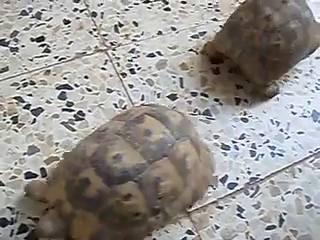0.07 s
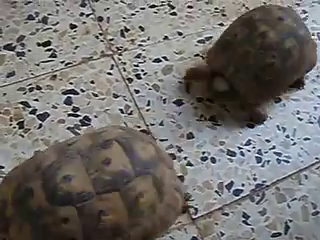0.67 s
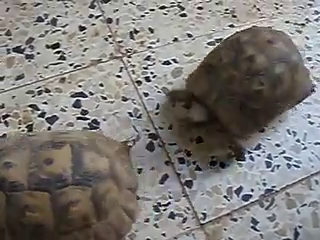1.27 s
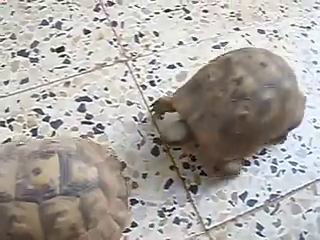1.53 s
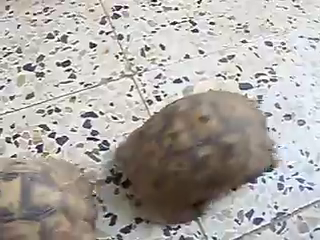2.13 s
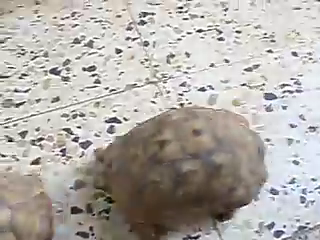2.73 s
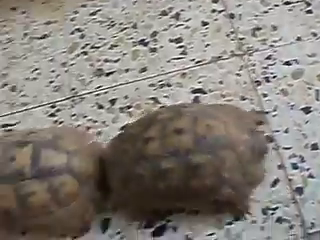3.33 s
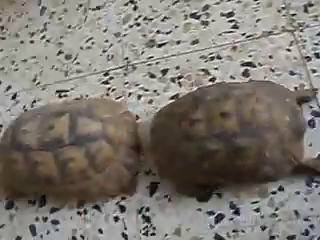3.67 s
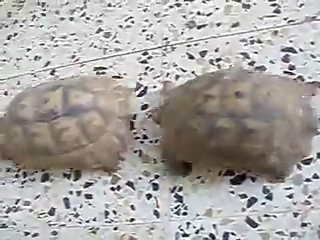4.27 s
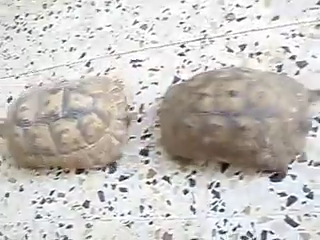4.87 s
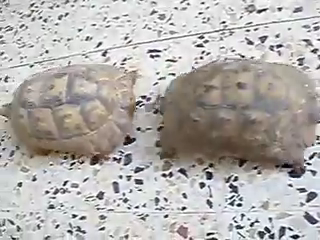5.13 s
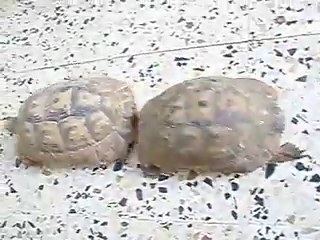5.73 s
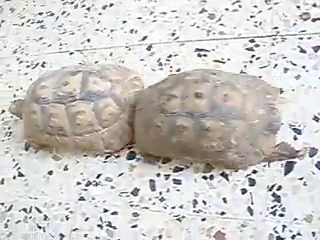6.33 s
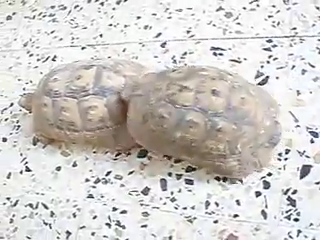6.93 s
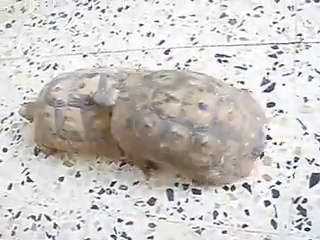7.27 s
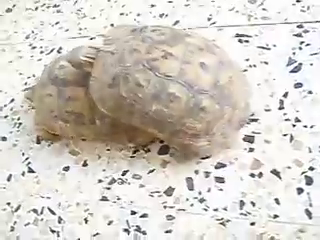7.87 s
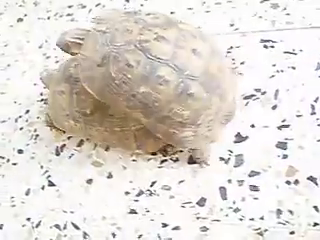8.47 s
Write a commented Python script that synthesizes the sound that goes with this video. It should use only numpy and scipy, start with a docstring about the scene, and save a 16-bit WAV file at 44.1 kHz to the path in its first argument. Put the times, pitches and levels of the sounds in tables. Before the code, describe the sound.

Over room hiss, a tortoise scuffs across tile and repeatedly butts another's shell, mostly dropping back with a sharp click.

```python
"""Two tortoises on a tiled floor indoors, close to a narrow-band phone microphone that peaks near 3.5 kHz.
Hiss and a low room rumble come first, then claws and shell rims scuff and tap on the tile.
From 3.2 s one rams the other: shell butts shell with a hollow knock, and the rammer mostly drops back
with a sharp tick. The second butt sets the rammed shell rocking; the loudest knocks overload the phone.
After more scuffs, a double butt at 7.8 s ends the bout."""
import sys
import numpy as np
from scipy import signal
from scipy.fft import rfft, irfft, next_fast_len
from scipy.io import wavfile

SR = 44100
rng = np.random.default_rng(int(sys.argv[2]) if len(sys.argv) > 2 else 0)


def to_wav(sig):
    """Store sig (one row per channel, or 1-D mono) as 16-bit WAV at the path in sys.argv[1].

    Samples outside -1..1 are clipped; the rate is SR.
    """
    pcm = np.clip(np.atleast_2d(sig), -1, 1) * 32767
    pcm = np.round(pcm).astype(np.int16)
    wavfile.write(sys.argv[1], SR, pcm.T)  # frames by channels


N = 379260
T = np.arange(N) / SR
RING_T = T[:SR // 4]

# spectrum of the hiss in the room: (frequency [Hz], level [dB])
HISS_SPECTRUM = [(200, -22.5), (500, -16), (850, -6), (1150, 0), (1600, -2.5), (2500, -4.5), (3500, -3.5),
                 (3900, -15.5)]
# spectrum of the room's rumble: (frequency [Hz], level [dB])
RUMBLE_SPECTRUM = [(12, -37), (20, -33.5), (50, -13.5), (95, -1), (125, -3.5), (172, -0.5), (215, -4),
                   (340, -7), (450, -13), (800, -16.5), (2000, -32)]
# the microphone's self-noise: (frequency [Hz], level [dB])
MIC_SPECTRUM = [(100, -18), (600, -8), (1500, -6), (2900, -7.5), (3200, -4.5), (3550, 1.5), (3750, -2),
                (4000, -17.5), (4400, -6.5), (4800, -20)]
# colour of the tiled room's echo: (frequency [Hz], level [dB])
ECHO_SPECTRUM = [(100, -1), (210, 0), (600, -4), (1100, -6.5), (1800, -5.5), (2700, -4.5), (3500, -0.5),
                 (5000, -7.5)]
# the phone's treble cut-off: (frequency [Hz], gain [dB])
PHONE_RESPONSE = [(3650, -1), (3800, -2.5), (3980, -3), (4300, -11.5), (4500, -27.5), (4700, -48),
                  (4900, -83.5)]
# modes of the domed shell: (frequency [Hz], level [dB], 60 dB decay time [s])
DOME_MODES = [(156, -15, 0.055), (210.6, -7, 0.079), (264, -12.5, .07), (334, -4.5, 0.055),
              (470, -8, 0.051), (497, -6.5, 0.041), (607, -2.5, 0.031), (680, -7, 0.042), (853, -5, 0.028),
              (1060, -12, 0.014)]
# modes of a struck shell plate: (frequency [x plate pitch], level [dB], swell time [s])
PLATE_MODES = [(.85, -11, 0.00061), (1.0, 1, 0.00072), (1.281, -4, .0006), (1.601, -10.5, 0.00045)]
# close partials of the bright tick, a click ringing at the microphone's 3.5 kHz peak:
# (frequency [x tick pitch], level [dB])
TICK_PARTIALS = [(0.899, -11.5), (1.0, -3.5), (1.09, -12)]
# claws and rims drag on tile: (time [s], length [s], dull rub [dB], bright scratch [dB])
DRAGS = [(.675, 0.066, -47, -31), (1.842, 0.079, -33, -41), (2.049, 0.053, -28, -30),
         (2.898, 0.057, -28.5, -44), (3.28, 0.072, -32, -45), (6.729, 0.075, -53, -35.5),
         (7.2, 0.12, -43.5, -36)]
# a claw taps the tile: (time [s], level [dB], swell time [s])
CLAW_TAPS = [(2.0597, -7.5, 0.00087), (7.3725, -14, .0006), (7.7980, -8, 0.0024)]
# the rammer lands on tile: (time [s], near rim [dB], tick pitch [Hz], far rim lag [s], far rim [dB])
LANDINGS = [(3.2257, -4, 3472, .004, -25), (4.7508, 2.5, 3400, .003, -19.5), (5.6150, 3.5, 3210, .0063, -1),
            (6.2890, 3, 3366, 0.0046, -4.5)]
# shell butts shell, with body and tick relative to the shell wall:
# (time [s], force [dB], hollow body [dB], plate pitch [Hz], tick pitch [Hz], tick [dB])
RAMS = [(3.2201, -5, -8.5, 2016, 3340, 7), (3.7435, -7, -1.5, 1888, 3427, 11),
        (4.7070, -4.5, 1, 1690, 3590, -7), (5.5691, -9, 4.5, 1746, 3230, -0.5),
        (6.2333, -3.5, -0.5, 1970, 3567, 3), (7.8012, -7.5, -6.5, 1130, 3390, -11),
        (7.8220, -3, -11, 1210, 3653, 0)]

BODY_HZ, WALL_HZ = 260, 547  # the dome's hollow body sounds below these, its stiffer wall above
CLAW_HZ, BELLY_HZ = 3435, 1640  # pitch of a claw's tick and of the belly plate
HISS_DB, HISS_CREST_S, HISS_RISE_DB_PER_S, HISS_FADE_DB_PER_S = -26, .75, 2.5, 1.2
RUMBLE_DB, RUMBLE_FADE_DB_PER_S = -33.8, 0.58
LUNGE_LEAD_S, LUNGE_S, LUNGE_RUB_DB, LUNGE_SCRATCH_DB = 0.05, 0.057, -51, -36.5


def undb(db):
    """Decibels to gain."""
    return 10 ** (np.asarray(db) / 20)


def unit(x):
    """Scale to rms 1."""
    return x / np.sqrt(np.mean(x ** 2) + 1e-18)


def colour(x, points):
    """Filter by a spectrum of (frequency [Hz], level [dB]) points."""
    hz, db = np.transpose(points)
    size = next_fast_len(len(x) + 4096)
    bin_hz = np.maximum(np.fft.rfftfreq(size, 1 / SR), 1)
    gain = undb(np.interp(np.log(bin_hz), np.log(hz), db))
    return irfft(rfft(x, size) * gain, size)[:len(x)]


def noise(points, length=N):
    """Coloured noise of rms 1."""
    return unit(colour(rng.standard_normal(length), points))


def fade(t, t60):
    """Exponential decay, 60 dB down at t60."""
    return np.exp(-np.log(1000) * t / t60)


def burst(t, swell_s):
    """Envelope of a heavily damped ring: it peaks at 1 after swell_s and is soon gone."""
    return t / swell_s * np.exp(1 - t / swell_s)


def add(track, s, x):
    """Mix x into the track from time s."""
    start = int(s * SR)
    track[start:start + len(x)] += x[:N - start]


def room_tone(waver_db=0.5):
    """The room's hiss swells briefly, then fades slowly along with a wavering low rumble."""
    since_crest = T - HISS_CREST_S
    hiss_db = HISS_DB + np.minimum(HISS_RISE_DB_PER_S * since_crest, -HISS_FADE_DB_PER_S * since_crest)
    waver = noise([(1, 0), (6, 0), (20, -40), (60, -120)])
    rumble_db = RUMBLE_DB - RUMBLE_FADE_DB_PER_S * T + waver_db * waver
    return undb(hiss_db) * noise(HISS_SPECTRUM) + undb(rumble_db) * noise(RUMBLE_SPECTRUM)


def mic_noise(level_db=-32.5):
    """The microphone's own steady hiss, strongest near 3.5 kHz."""
    return undb(level_db) * noise(MIC_SPECTRUM)


def room_echo(x, wet_db=-11.5, t60=.4, first_wall_s=0.0076):
    """Bare walls send a short diffuse tail back to the microphone."""
    t = T[:SR]
    onset = np.clip(t / first_wall_s - .5, 0, 1)
    tail = colour(rng.standard_normal(len(t)), ECHO_SPECTRUM) * fade(t, t60) * onset
    in_band = np.abs(rfft(tail))[100:4000]  # bins are 1 Hz apart
    tail /= np.sqrt(np.mean(in_band ** 2))
    return undb(wet_db) * signal.fftconvolve(x, tail)[:N]


def dome(t, body_db, wall_db, scatter=0.04, build_cycles=0.74, phase_spread=1.1):
    """The shell rings; where it is hit sets the share of body and wall. Low modes build up last."""
    out = 0
    for hz, db, t60 in DOME_MODES:
        share_db = np.interp(np.log(hz), np.log([BODY_HZ, WALL_HZ]), [body_db, wall_db])
        detune, phase = rng.standard_normal(2)
        wave = np.sin(2 * np.pi * hz * (1 + scatter * detune) * t + phase_spread * phase)
        build_up = 1 - np.exp(-t * hz / build_cycles)
        out = out + undb(db + share_db) * wave * fade(t, t60) * build_up
    return out


def tick(t, hz, db, swell_s, grit_db=-15, snap_hz=2400, snap_db=-10, snap_s=0.00031):
    """Hard contact: a one-cycle snap, a brief ring at the microphone's peak and a gritty crack."""
    grit = noise([(500, -13), (1300, -3), (2500, -6.5), (3300, 2.5), (3900, -1), (4800, -38.5)], len(t))
    snap = undb(snap_db) * burst(t, snap_s) * np.sin(2 * np.pi * snap_hz * t)
    ring = sum(undb(level) * np.sin(2 * np.pi * hz * ratio * t) for ratio, level in TICK_PARTIALS)
    return undb(db) * (snap + burst(t, swell_s) * (ring + undb(grit_db) * grit))


def blow(body_db, wall_db, plate_hz, plate_db, tick_hz, tick_db, swell_s):
    """One blow rings the whole shell, clacks the plate that it lands on and ticks at the contact."""
    t = RING_T
    clack = sum(undb(plate_db + db) * burst(t, swell) * np.sin(2 * np.pi * plate_hz * ratio * t)
                for ratio, db, swell in PLATE_MODES)
    return tick(t, tick_hz, tick_db, swell_s) - clack - dome(t, body_db, wall_db)


def scuffs(slips_per_s=600, scratch_hz=3450):
    """Claws and rims drag in uneven slips: the body rumbles and the contact scratches."""
    out = np.zeros(N)
    # the hind claws push off just before each butt
    lunges = [(s - LUNGE_LEAD_S, LUNGE_S, LUNGE_RUB_DB, LUNGE_SCRATCH_DB) for s, *_ in RAMS]
    for s, length, rub_db, scratch_db in DRAGS + lunges:
        t = T[:int(length * SR)]
        slips = (rng.random(len(t)) < slips_per_s / SR) * rng.standard_normal(len(t))
        rub = unit(signal.fftconvolve(slips, dome(t, body_db=0, wall_db=-16))[:len(t)])
        scratch = unit(signal.fftconvolve(slips, tick(t, scratch_hz, db=0, swell_s=0.00063))[:len(t)])
        stroke = np.sin(np.pi * t / length)
        add(out, s, (undb(rub_db) * rub + undb(scratch_db) * scratch) * stroke)
    return out


def claw_taps():
    """A claw is too light to ring the shell: only the tick sounds."""
    out = np.zeros(N)
    for s, db, swell_s in CLAW_TAPS:
        add(out, s, tick(RING_T, CLAW_HZ, db, swell_s))
    return out


def rocking(start_s=3.751, bounces=6, first_db=-7.5, loss_db=1.5, first_gap_s=.017, gap_ratio=.75):
    """The rammed shell rattles to rest in dull bounces, each sooner and softer."""
    out, s = np.zeros(N), start_s
    for k in range(bounces):
        bounce = blow(body_db=3, wall_db=-3, plate_hz=BELLY_HZ, plate_db=-15,
                      tick_hz=3540, tick_db=-9.5, swell_s=.0008)
        add(out, s, undb(first_db - k * loss_db) * bounce)
        s += first_gap_s * gap_ratio ** k
    return out


def drops():
    """Shell on tile: the near rim lands with a bright tick, then the far rim with a duller clack."""
    out = np.zeros(N)
    for s, near_db, tick_hz, lag_s, far_db in LANDINGS:
        near = blow(body_db=-23, wall_db=-20.5, plate_hz=BELLY_HZ, plate_db=-14,
                    tick_hz=tick_hz, tick_db=1, swell_s=0.00092)
        far = blow(body_db=-7, wall_db=-11, plate_hz=BELLY_HZ, plate_db=-0.5,
                   tick_hz=tick_hz, tick_db=-4, swell_s=0.00075)
        add(out, s, undb(near_db) * near)
        add(out, s + lag_s, undb(far_db) * far)
    return out


def butts():
    """Shell on shell: a hollow knock whose parts all grow with the force."""
    out = np.zeros(N)
    for s, force_db, body_db, plate_hz, tick_hz, tick_db in RAMS:
        knock = blow(body_db=body_db, wall_db=0, plate_hz=plate_hz, plate_db=1.8,
                     tick_hz=tick_hz, tick_db=tick_db, swell_s=.0012)
        add(out, s, undb(force_db) * knock)
    return out


def overload(x, full_scale=.72, wraps=2):
    """The phone clips hard; the sharpest crests wrap to the other rail for one sample and snap."""
    sharpness = np.abs(np.convolve(x, [1, -2, 1], "same"))
    crests = signal.find_peaks(sharpness, distance=SR // 10)[0]
    sharpest = crests[np.argsort(sharpness[crests])[-wraps:]]
    clipped = np.clip(x, -full_scale, full_scale)
    clipped[sharpest] *= -1
    return clipped


def scene():
    """The tortoises close up, in mono, with the tiled room behind them."""
    background = room_tone() + mic_noise()
    tortoises = butts() + drops() + rocking() + claw_taps() + scuffs()
    return (tortoises + room_echo(tortoises) + background)[None]


def record(dry):
    """The phone keeps only the speech band, overloads on the knocks and cuts off above 16.5 kHz."""
    clipped = overload(colour(dry[0], PHONE_RESPONSE))
    top_cut = signal.ellip(8, .2, 70, 16500, fs=SR, output="sos")
    return signal.sosfilt(top_cut, clipped)[None]


dry = scene()
out = record(dry)
to_wav(out)
```